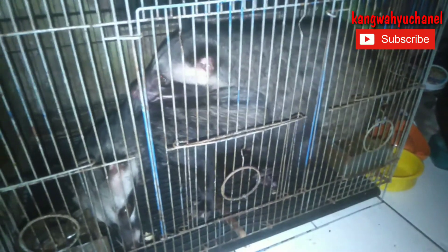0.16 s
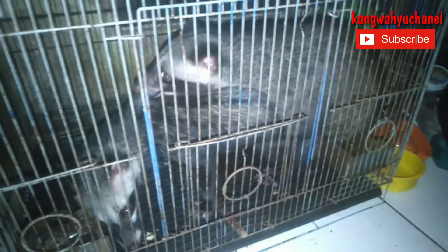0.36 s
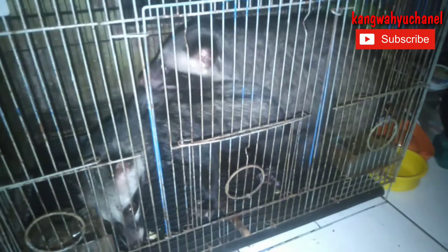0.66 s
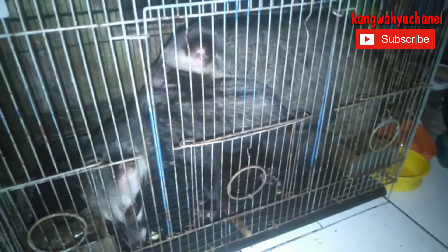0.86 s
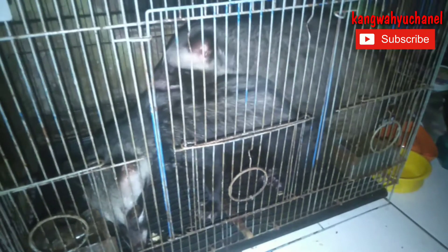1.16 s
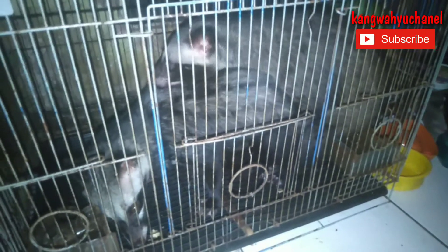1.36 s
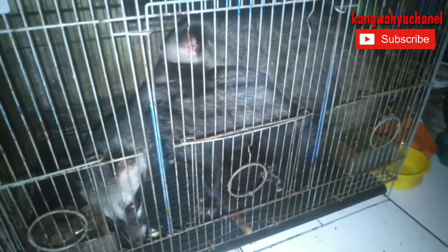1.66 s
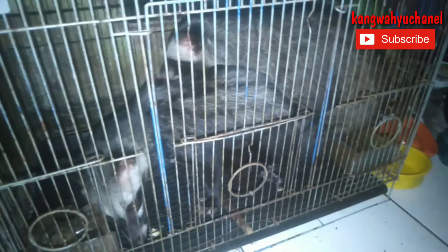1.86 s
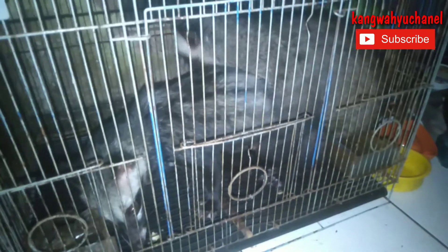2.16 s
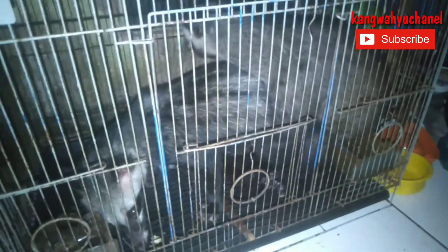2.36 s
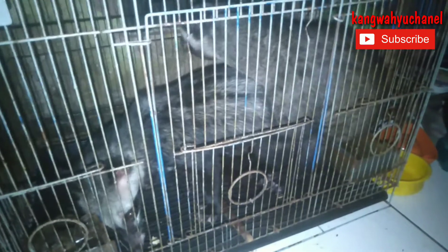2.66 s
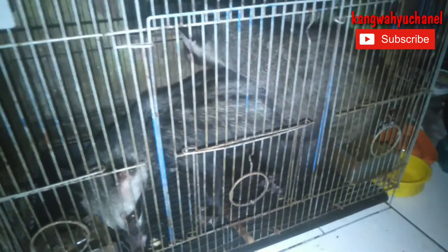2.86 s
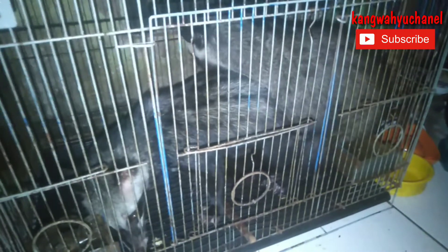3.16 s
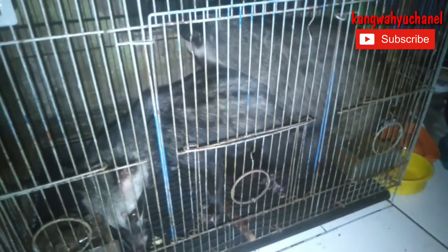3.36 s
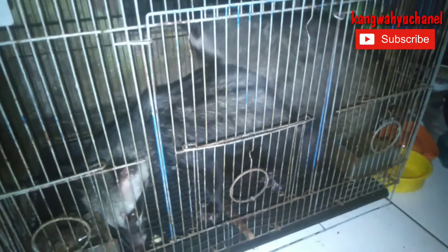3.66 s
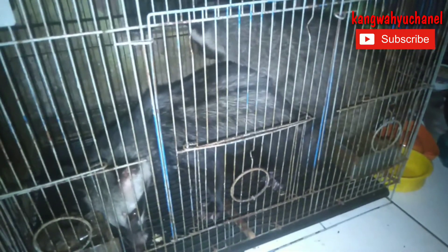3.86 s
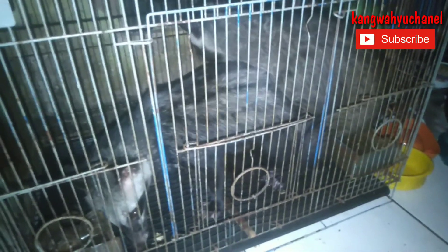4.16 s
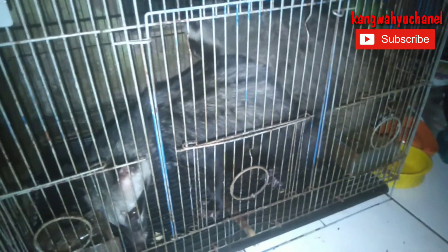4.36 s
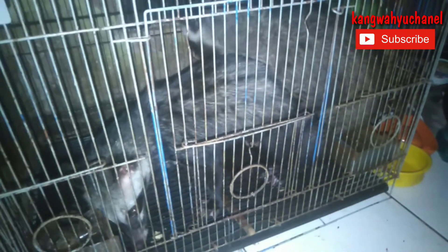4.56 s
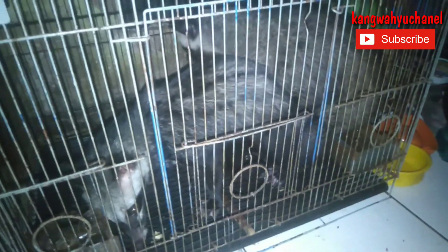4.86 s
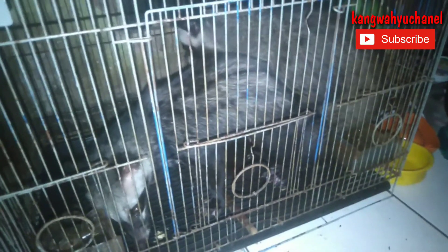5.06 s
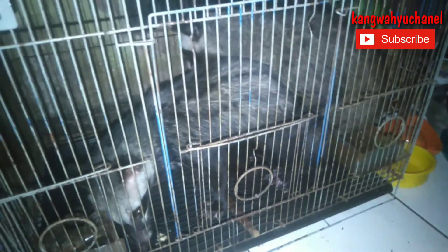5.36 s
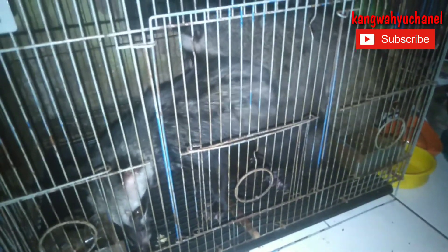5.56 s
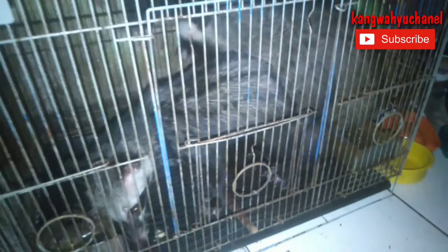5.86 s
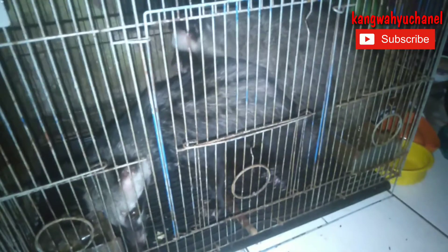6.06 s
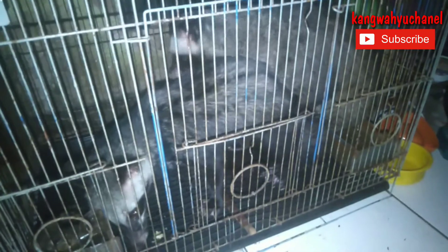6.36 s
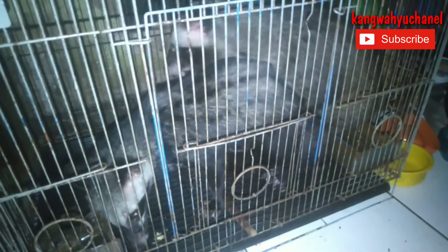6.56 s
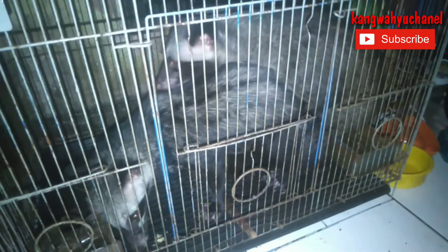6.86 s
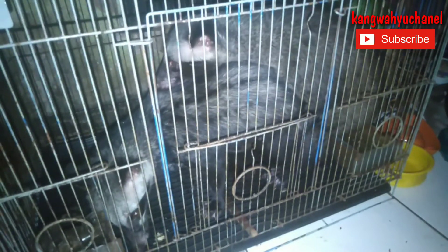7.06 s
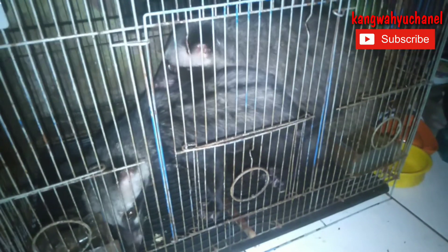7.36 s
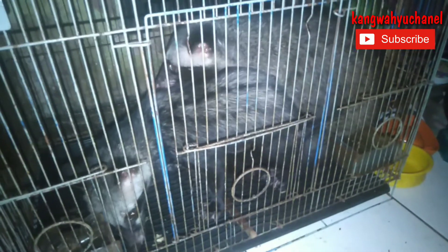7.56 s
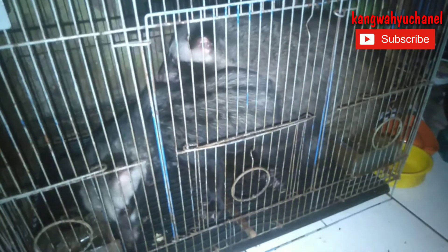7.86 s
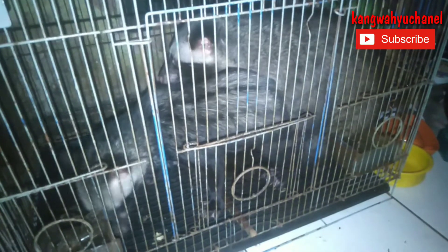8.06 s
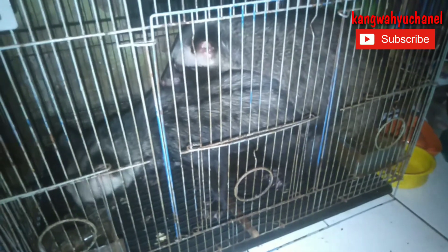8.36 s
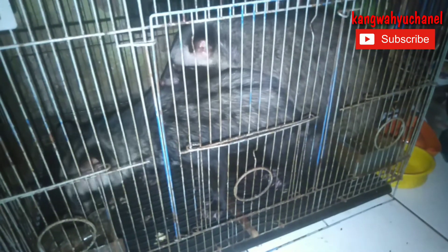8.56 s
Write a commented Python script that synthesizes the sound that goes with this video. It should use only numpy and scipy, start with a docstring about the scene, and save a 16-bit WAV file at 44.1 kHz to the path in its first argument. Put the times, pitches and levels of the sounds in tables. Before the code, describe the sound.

A caged civet gives three long, clear, high wailing calls in a small tiled room, then one tiny gulp, over faint hum and insect chirring.

```python
"""A caged civet gives three long, high, clear calls in a small tiled room and later one short gulp.
Its voice sums sine partials shaped by throat resonances, with noise for the air hissing through the folds.
The cage ticks now and then (noise bursts and ringing wires) and an insect chirps (pulsed, filtered noise).
A far appliance drones on wavering low sines, and the room hums faintly as spectrally shaped noise."""
import sys
import numpy as np
from scipy import signal
from scipy.io import wavfile
from scipy.ndimage import uniform_filter1d

SR = 44100
rng = np.random.default_rng(int(sys.argv[2]) if len(sys.argv) > 2 else 0)


def bounce(signal):
    """Save signal as a 16-bit WAV file at the path given by the first command-line argument."""
    frames = np.transpose(np.atleast_2d(signal))
    limited = np.clip(frames, -1, 1)
    pcm = np.round(limited * 32767).astype(np.int16)
    wavfile.write(sys.argv[1], SR, pcm)


N = 384993  # length in samples

# The calls. Each row: start in s, end in s, first-breath lift of the fundamental in dB,
# share by which the pitch drops in the choke.
CALLS = [(.351, 2.935, 10, .1), (3.414, 5.432, 30, 0.088), (5.865, 7.552, 13, .07)]
# Pitch while each call starts, then while it is held, before jitter and choke.
# One list a call; each row: time in s, pitch in Hz.
ONSET_PITCH = [
    [(0.353, 747), (0.367, 738), (0.377, 702), (0.475, 804), (0.529, 742), (0.587, 761), (0.673, 735),
     (0.699, 765), (0.733, 917), (0.751, 890), (0.771, 808), (0.8, 776)],
    [(3.42, 864), (3.44, 824), (3.45, 755), (3.458, 731), (3.546, 657), (3.552, 669), (3.586, 657),
     (3.636, 683), (3.65, 703), (3.678, 719), (3.7, 726)],
    [(5.865, 794), (5.881, 697), (5.897, 678), (5.917, 672.5), (5.973, 690), (5.985, 681), (6.091, 737.4),
     (6.1, 731)],
]
HOLD_PITCH = [
    [(0.81, 778.1), (0.85, 792), (0.95, 781.6), (0.98, 770), (1.04, 812), (1.09, 805.1), (1.12, 791),
     (1.27, 789.5), (1.33, 807.8), (1.44, 785.4), (1.5, 827), (1.56, 805.6), (1.62, 816.4), (1.7, 795),
     (1.82, 795.7), (1.89, 780.9), (2.31, 779.1), (2.37, 799), (2.46, 807.8), (2.51, 792), (2.71, 775),
     (2.87, 750), (2.89, 729)],
    [(3.71, 725.4), (3.84, 726), (3.896, 757), (3.928, 758.8), (3.942, 749.5), (4.06, 776.7), (4.14, 778.5),
     (4.22, 806.3), (4.266, 783.6), (4.382, 796.6), (4.612, 782.4), (4.752, 761), (4.804, 757), (4.93, 732),
     (5.034, 762.8), (5.198, 748.3), (5.39, 718.4)],
    [(6.11, 721), (6.144, 747.3), (6.312, 740.2), (6.336, 757.6), (6.37, 741.6), (6.436, 755.6),
     (6.534, 745), (6.55, 756.5), (6.616, 750.5), (6.792, 772.7), (6.9, 768.3), (6.908, 761.2),
     (7.112, 765.2), (7.182, 749.5), (7.286, 775.8), (7.51, 744)],
]
# Voice control through each call, one list a call. Each row: time in s, effort in dB before the throat,
# lift of the second partial in dB, level of the treble in dB before the resonances.
VOICE_CONTROL = [
    [(0.35, -39.5, 12, -64), (0.38, -48.5, 19.5, -75), (0.46, -51, 15.5, -84), (0.5, -35, 17.5, -54.5),
     (0.6, -22.5, 5, -51), (0.68, -27.5, 6, -53), (0.74, -24, -0.5, -44.5), (0.8, -24, -5.5, -53.5),
     (1, -22, -4.5, -50.5), (1.8, -23, -3.5, -50), (2.4, -21.5, -1.5, -49.5), (2.75, -22.5, -3, -49),
     (2.89, -22.5, -6.5, -53)],
    [(3.42, -77.5, 1, -87), (3.45, -60.5, 24, -85), (3.6, -46.5, 5, -71), (3.7, -34.5, 11.5, -57.5),
     (3.88, -27.5, 8.5, -50), (4.1, -26, 2, -50.5), (4.4, -24, 0.5, -49), (4.75, -24, 0, -52),
     (4.9, -26.5, -2, -58), (5.05, -23.5, -0.5, -50), (5.2, -24.5, -1, -55), (5.39, -27.5, -1, -60.5)],
    [(5.865, -59.5, 25.5, -83), (5.9, -50.5, 10.5, -89), (5.97, -43.5, 7.5, -69), (6.1, -28, 9.5, -51),
     (6.3, -30, 10.5, -53), (6.55, -24, 4.5, -51.5), (6.8, -29, 7.5, -50), (7.1, -26.5, 3, -53.5),
     (7.3, -26, 4.5, -49), (7.42, -29, 2, -55.5), (7.51, -28.5, 1.5, -55)],
]
# Throat and mouth under the first four partials. Each row: frequency in Hz, gain in dB re effort.
LOW_THROAT = [(650, -33.5), (760, -24.5), (800, -23), (920, -15.5), (1400, -20), (1550, -12.5),
              (1800, -10.5), (2000, -5.5), (2200, -5), (2380, -1.5), (2700, -13.5), (2950, -12.5),
              (3120, 0), (3600, -4)]
# Throat and mouth above the fourth partial. Each row: frequency in Hz, gain in dB re the treble level.
HIGH_THROAT = [(3600, -16), (4040, 0), (4400, -22.5), (4800, -8.5), (5150, -20.5), (5420, -11.5),
               (5900, -15.5), (6280, -7.5), (6520, -12), (6750, 2), (7300, 2), (8000, -11.5), (8700, -21.5),
               (9150, -37.5), (13500, -36), (14200, -19.5), (15300, -23), (16500, -37)]
# Resonances of the air hissing through the folds. Each row: centre in Hz, width of one filter pass in Hz,
# level in dB re the effort of the call at zero hoarseness.
AIR_RESONANCES = [(703, 1800, -68), (1500, 260, -66.5), (2032, 170, -44), (6900, 1500, -49)]
# Cracks of the voice. Each row: centre in s, spread in s, added hoarseness on a scale of 0-1.
VOICE_CRACKS = [(.35, 0.041, 0.39), (.75, .045, .35), (3.62, .04, .3), (5.867, 0.033, 0.4)]
# Change through the choke, in dB, of partials 1 (at the snap), 2, 3 and 4, then of the treble.
CHOKE_CHANGE_DB = [8.5, -12, -13.5, -15, -17]
# Narrow bands cancelled by room echoes, so a partial dims as it slides through.
# Each row: centre in Hz, half width in Hz, depth in dB.
ROOM_NOTCHES = [(735, 12, -15), (773.8, 4.1, -18.5), (821.3, 8, -20), (1457.5, 15, -8), (1639, 7.4, -9.5),
                (2245.4, 18.1, -14), (2981, 15, -10), (3105, 12, -4.5), (3167, 25, -8), (3916, 60, -16.5),
                (4683, 56, -12.5), (6130, 48, -5.5), (6860, 33, -6.5), (7124, 33, -11), (7665, 28, -9.5),
                (7815, 39, -10.5)]
# The gulp. Each row: time in s, pitch in Hz, level of the fundamental in dB.
GULP_CURVE = [(8.046, 600, -63), (8.054, 590, -47.5), (8.064, 512, -45.5), (8.069, 493, -53),
              (8.073, 494, -73)]
# Ticks and scuffs on the cage. Each row: start in s, level in dB, rise time constant in s,
# fall time constant in s, centre in Hz, width of one filter pass in Hz, share of wire ring.
CAGE_TICKS = [(.213, -70, 0.0043, 0.0078, 4040, 1500, 0.1), (1.215, -55, .015, 0.035, 4400, 6010, 0.17),
              (3.527, -57.5, .002, .012, 13500, 8050, 0.33),
              (5.513, -62.5, 0.004, 0.061, 1500, 2010, 0.041), (5.513, -69, .003, 0.014, 5700, 795, 0.0063),
              (5.73, -72, 0.016, 0.027, 3700, 1990, 0.089), (5.80, -70.5, .01, 0.022, 3520, 2520, 0.068),
              (5.915, -72, .004, .015, 3970, 1500, 0.016), (6.096, -68, 0.00091, 0.0064, 14000, 6000, 0),
              (6.215, -68, .01, 0.019, 4000, 2000, 0), (6.322, -68, .01, 0.018, 4000, 2000, 0),
              (6.55, -66, .01, .025, 4500, 2500, 0), (7.25, -66, .01, .025, 4010, 2500, 0),
              (8.582, -67, .001, 0.0043, 5300, 3480, 0.016)]
# Wires ringing after a tick. Each row: frequency in Hz, level in dB before the share, t60 in s.
WIRE_MODES = [(2995, 12, 0.093), (3370, -25, 0.12), (4775, -22, .04)]
# Pace of the insect. Each row: time in s, chirps counted so far.
CHIRP_COUNT = [(-.036, 0), (2.995, 23), (5.576, 43), (7.523, 57), (7.915, 60), (8.8, 66)]
# Tones of a far appliance. Each row: mean frequency in Hz, mean amplitude in dB.
APPLIANCE_TONES = [(53, -74), (101, -79), (190, -78.5), (1160, -77.5)]
# Relative spectrum of room hum and microphone hiss. Each row: frequency in Hz, density in dB per Hz.
HUM_SPECTRUM = [(12, -14.5), (22, 2), (34, -3), (53, 8), (74, -6), (171, -5), (266, -14.5), (393, -11.5),
                (1010, -7.5), (1160, -9.5), (1500, -7), (2610, -16), (3700, -20.5), (5090, -23.5),
                (7730, -25), (15500, -27)]
# Decay of the room. Each row: frequency in Hz, t60 in s, relative level in dB.
ROOM_DECAY = [(400, 0.38, 2), (1000, 0.3, -2), (2000, .33, -11), (3060, 0.28, 3.5), (7000, 0.22, 1)]

FOURTH_DB = -16.5  # the folds give a weak fourth partial
SHUT_DB, OPEN_DB = -75.5, -57  # treble level with mouth shut and open
MURMUR_DB, MUFFLE_DB = 19.5, -3  # a shut mouth lifts the fundamental and dims the third partial
FULL_DB, TOP_FOLLOWS = -22, .8  # partials over 9 kHz fade further when effort falls short of full
MID_FOLLOWS = 0.27  # partials 5 and 6 share the lift of the second
BLUR = .0018  # rms phase jitter, radians per squared partial number
BREATH_S = 0.022  # time constant of the first breath
TRAIL_S, TRAIL_DB = .075, -17  # the fundamental alone hums on after the choke while it fades
CHOKE_S, SNAP = .031, .35  # length of the choke; the pitch snaps down in this share of it
CLEAR, CHOKE_HOARSE = .05, .45  # hoarseness 0-1: of the held voice, added by the choke
WOBBLE = .032  # share by which a fully hoarse voice throws the pitch about, rms
HUM_DB = -64.5
EDGE_HZ = 15560  # upper band limit


def cry(start, end, breath_db, drop, onset_hz, hold_hz, controls):
    """Source-filter principle: vocal folds give harmonic partials and hissing air, the throat weights them."""
    t = np.arange(start, end + TRAIL_S, 1 / SR)
    stop = np.clip((end - t) / .008, 0, 1)
    trail = np.clip((t - end) / TRAIL_S, 0, 1)
    s, *curves = np.transpose(controls)
    effort_db, lift_db, treble_db = (np.interp(t, s, curve) for curve in curves)
    shut = np.clip((OPEN_DB - treble_db) / (OPEN_DB - SHUT_DB), 0, 1)
    choke = np.clip(1 - (end - t) / CHOKE_S, 0, 1)
    snap = np.minimum(choke / SNAP, 1)
    hoarse = hoarseness(t, choke)

    glide = uniform_filter1d(np.interp(t, *np.transpose(onset_hz + hold_hz)), 200) * (1 - drop * snap)
    jitter = 0.0019 * drift(len(t), 0.0091) + WOBBLE * hoarse * drift(len(t), 0.0055)
    hz = glide * (1 + jitter)
    turn = 2 * np.pi * np.cumsum(hz) / SR

    breath = breath_db * np.exp((start - t) / BREATH_S)
    first_db = MURMUR_DB * shut + breath + TRAIL_DB * np.sqrt(trail)
    own_db = [first_db, lift_db, MUFFLE_DB * shut, FOURTH_DB]
    low_db = low_levels(effort_db, own_db, glide, hz, choke, snap)
    low = low_partials(low_db, turn, hoarse, stop, trail)
    high = high_partials(effort_db, lift_db, treble_db, glide, hz, turn, choke, hoarse)
    effort = np.sqrt(sum(gain_of(db) ** 2 for db in low_db))
    air = stop * effort * (1 + 30 * hoarse) * fold_hiss(turn)
    call = np.sqrt(2) * (low + stop * high) + air
    return start, call * np.minimum((t - start) / .009, 1)


def hoarseness(t, choke):
    """Irregular fold vibration, on a scale of 0-1, grows at the cracks and in the choke."""
    cracks = sum(amount * np.exp(-((t - at) / spread) ** 2) for at, spread, amount in VOICE_CRACKS)
    return np.clip(CLEAR + CHOKE_HOARSE * np.minimum(3 * choke, 1) + cracks, 0, 1)


def low_levels(effort_db, own_db, glide, hz, choke, snap):
    """Cascaded filters multiply, so source, throat, room and choke levels of partials 1-4 add in dB."""
    levels = []
    for k in (1, 2, 3, 4):
        resonance = read(LOW_THROAT, k * glide)
        notches = dimming(k * uniform_filter1d(hz, 300))
        choke_db = CHOKE_CHANGE_DB[k - 1] * (snap if k == 1 else choke)
        levels.append(effort_db + resonance + notches + own_db[k - 1] + choke_db)
    return levels


def low_partials(low_db, turn, hoarse, stop, trail):
    """Fourier synthesis of partials 1-4; hoarseness makes each stutter by amplitude modulation."""
    low = 0
    for k, db in enumerate(low_db, 1):
        ending = 1 - trail if k == 1 else stop
        stutter = 1 + 1.29 * hoarse * np.tanh(drift(len(turn), 0.0065))
        low = low + gain_of(db) * ending * stutter * np.sin(k * turn + 2 * np.pi * rng.random())
    return low


def high_partials(effort_db, lift_db, treble_db, glide, hz, turn, choke, hoarse):
    """Fourier synthesis of partials 5-22, weighted by resonance and blurred by phase modulation."""
    high = 0
    for k in range(5, 23):
        top_db = (k * glide > 9000) * TOP_FOLLOWS * (effort_db - FULL_DB)
        middle_db = (k < 7) * MID_FOLLOWS * lift_db
        source_db = treble_db + CHOKE_CHANGE_DB[-1] * choke + top_db + middle_db
        filter_db = uniform_filter1d(read(HIGH_THROAT, k * hz) + dimming(k * hz), 200)
        # each partial wavers in level by itself, at random and quickly
        db = source_db + filter_db + 3.11 * drift(len(turn), 0.025) - 12 * hoarse
        blur = BLUR * k ** 2 * drift(len(turn), .003)  # the higher the partial, the fuzzier
        high = high + gain_of(db) * np.sin(k * turn + blur + 2 * np.pi * rng.random())
    return high


def fold_hiss(turn):
    """Turbulence noise, puffed once a cycle by the folds and coloured by resonances."""
    air = rng.standard_normal(len(turn)) * (1 + 0.2 * np.cos(turn))
    return sum(gain_of(db) * evened(resonate_twice(air, hz, width)) for hz, width, db in AIR_RESONANCES)


def gulp():
    """A frequency glide: a short falling throat note with a weak second harmonic."""
    s, hz, db = np.transpose(GULP_CURVE)
    t = np.arange(s[0], s[-1], 1 / SR)
    turn = 2 * np.pi * np.cumsum(np.interp(t, s, hz)) / SR
    tone = np.sin(turn) + 0.083 * np.sin(2 * turn)
    return s[0], np.sqrt(2) * gain_of(np.interp(t, s, db)) * tone


def cage():
    """Impulsive excitation: each tick is a quick scratch of noise; a hard one sets wire modes ringing."""
    out, t = np.zeros(N), np.arange(SR // 5) / SR
    ring = sum(gain_of(db - 60 * t / t60) * np.sin(2 * np.pi * hz * t) for hz, db, t60 in WIRE_MODES)
    for s, db, rise, fall, hz, width, share in CAGE_TICKS:
        scratch = evened(resonate_twice(rng.standard_normal(len(t)), hz, width))
        shape = (1 - np.exp(-t / rise)) * np.exp(-t / fall)
        add(out, s, gain_of(db) * (scratch * shape / shape.max() + share * ring))
    return out


def insect():
    """Stridulation: each chirp swells over wing scrapes, about ninety a second, in a high resonance."""
    t = np.arange(N) / SR
    turn = 2 * np.pi * (np.interp(t, *np.transpose(CHIRP_COUNT)) - .04)
    swell = .35 + (.5 + .5 * np.cos(turn + .4 * np.cos(turn))) ** 1.3  # quick rise, slower fall
    scrapes = 1 + .5 * np.cos(2 * np.pi * np.cumsum(90 + 6 * drift(N, 0.57)) / SR)
    wing = rng.standard_normal(N) * scrapes
    for _ in range(4):  # steep flanks
        wing = resonate(wing, 6600, 1050)
    return gain_of(-70 + 1.8 * drift(N, .15)) * swell * evened(wing)


def room(x):
    """Reverberation: sparse echoes of random sign decay at a rate set by frequency, with one far wall."""
    taps = np.zeros(SR // 2)
    at = np.arange(300, SR // 2 - 20, 20)  # one tap in every 20 samples
    taps[at + rng.integers(0, 20, len(at))] = rng.choice([-1., 1.], len(at))
    hz, t, z = signal.stft(taps, SR, nperseg=256)
    f, t60, db = np.transpose(ROOM_DECAY)
    decay_db = 60 * t / np.interp(hz, f, t60)[:, None]
    z = z * gain_of(np.interp(hz, f, db)[:, None] - decay_db)
    tail = signal.istft(z, SR, nperseg=256)[1]
    tail = tail / np.linalg.norm(tail)
    add(tail, .048, [.5])  # the far wall
    return signal.fftconvolve(x, tail)[:N]


def dimming(hz):
    """Destructive interference: the dB change that the room notches make at a frequency."""
    return sum(db / (1 + ((hz - f) / half) ** 2) for f, half, db in ROOM_NOTCHES)


def drone():
    """Frequency and amplitude modulation: a far appliance's few low tones waver in pitch and strength."""
    out = 0
    for hz, db in APPLIANCE_TONES:
        level = gain_of(db + 2.5 * drift(N, .1))
        out = out + level * np.sin(2 * np.pi * np.cumsum(hz + 4 * drift(N, 0.049)) / SR)
    return out


def hum():
    """Filtered noise: random short-time spectra with drifting patches and a slow swell in the bass."""
    frames, hz = N // 512 + 5, np.fft.rfftfreq(2048, 1 / SR)
    a, b, patches = rng.standard_normal((frames, 1025, 3)).T
    patches = evened(uniform_filter1d(uniform_filter1d(patches, 20, 0), 6, 1))
    swell = evened(uniform_filter1d(rng.standard_normal(frames), 20)) * (hz[:, None] < 60)
    z = (a + 1j * b) * gain_of(read(HUM_SPECTRUM, hz)[:, None] + 0.45 * patches + 1.5 * swell)
    return gain_of(HUM_DB) * evened(signal.istft(z, nperseg=2048, noverlap=1536)[1][:N])


def gain_of(db):
    """Decibel law: 20 dB is a tenfold amplitude."""
    return 10 ** (np.asarray(db) / 20)


def evened(x):
    """Normalization to an rms of 1."""
    return x / np.sqrt(np.mean(x ** 2) + 1e-20)


def read(points, hz):
    """Interpolation of a response curve along log frequency."""
    f, value = np.transpose(points)
    return np.interp(np.log(hz + 1), np.log(f + 1), value)


def add(mix, s, sound):
    """Superposition: adds a sound into the mix from time s in seconds."""
    part = mix[round(s * SR):][:len(sound)]
    part += sound[:len(part)]


def resonate(x, hz, width):
    """Heterodyne resonance of gain 1: shifts hz down to zero, smooths, and shifts back."""
    turn = np.exp(2j * np.pi * hz * np.arange(len(x)) / SR)
    r = np.exp(-np.pi * width / SR)
    return 2 * (turn * signal.lfilter([1 - r], [1, -r], x / turn)).real


def resonate_twice(x, hz, width):
    """Cascaded resonance: two equal passes steepen the flanks."""
    return resonate(resonate(x, hz, width), hz, width)


def drift(length, seconds):
    """Low-passed noise: smooth chance of rms 1 that changes within about the given time."""
    size = max(round(seconds * SR), 1)
    return evened(uniform_filter1d(uniform_filter1d(rng.standard_normal(length), size), size))


def scene():
    """Superposition of the near sounds, their room response and the background."""
    near = cage()
    for span, *curves in zip(CALLS, ONSET_PITCH, HOLD_PITCH, VOICE_CONTROL):
        add(near, *cry(*span, *curves))
    add(near, *gulp())
    boom = resonate(near, 640, 4)  # one low room mode, set ringing as a call drops through it
    reverberant = near + gain_of(-11.0) * room(near) + gain_of(-2) * boom
    return (reverberant + insect() + drone() + hum())[None]


def record(dry):
    """Band limitation: a linear-phase low-pass removes what lies above the edge."""
    lowpass = signal.firwin(1501, EDGE_HZ, window=("kaiser", 9), fs=SR)
    return signal.oaconvolve(dry, lowpass[None], "same")


dry = scene()
out = record(dry)
bounce(out)
```